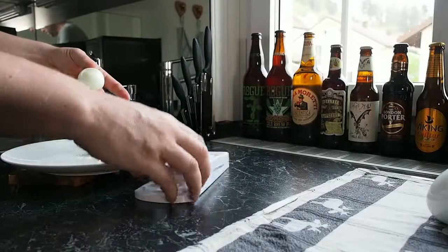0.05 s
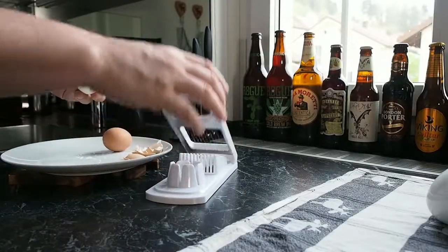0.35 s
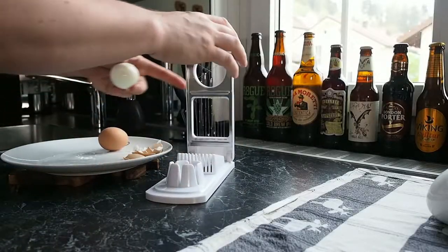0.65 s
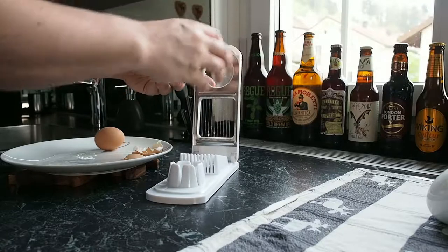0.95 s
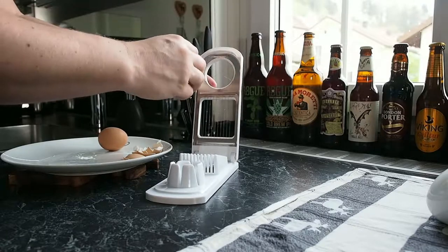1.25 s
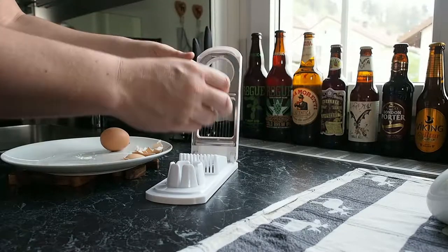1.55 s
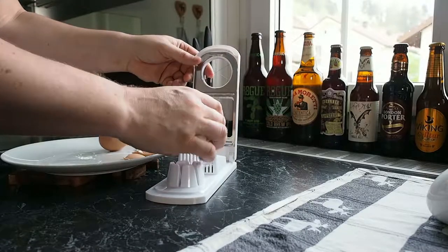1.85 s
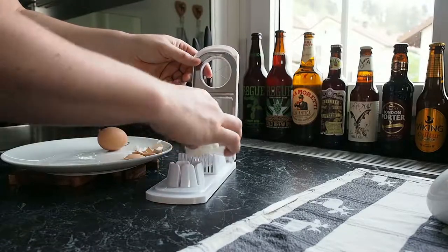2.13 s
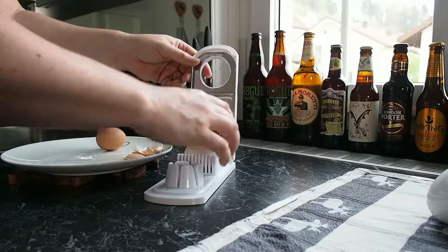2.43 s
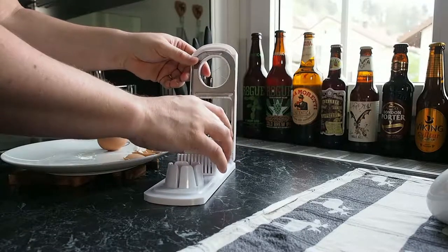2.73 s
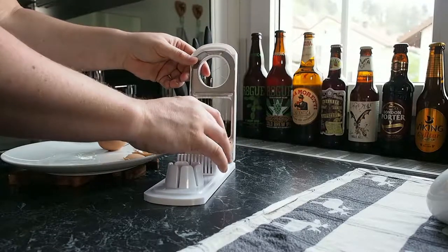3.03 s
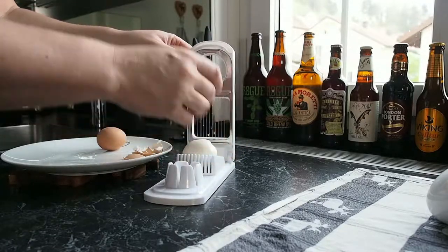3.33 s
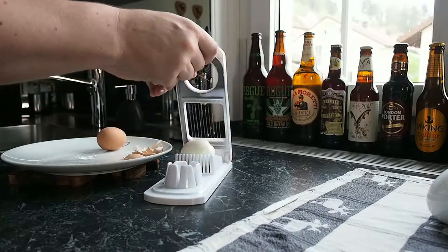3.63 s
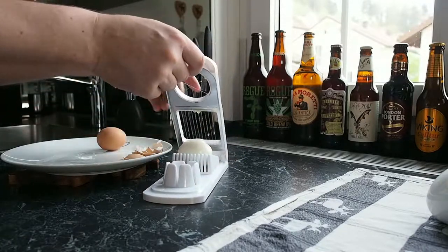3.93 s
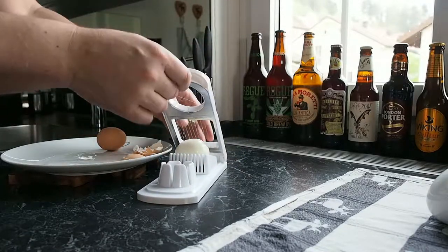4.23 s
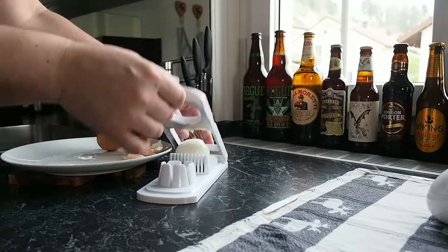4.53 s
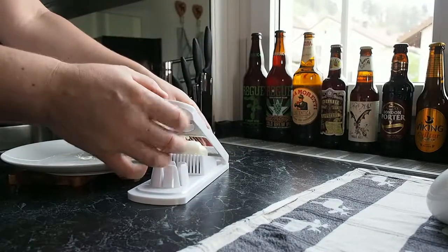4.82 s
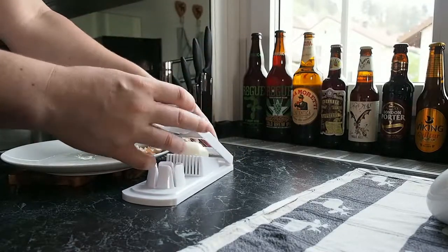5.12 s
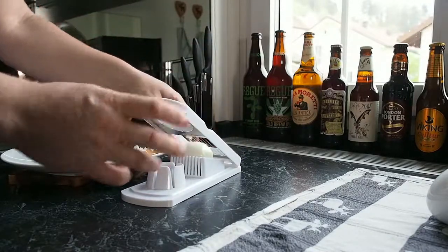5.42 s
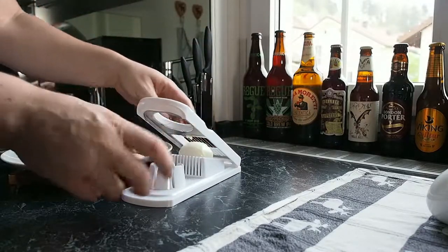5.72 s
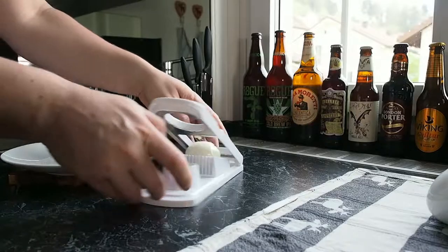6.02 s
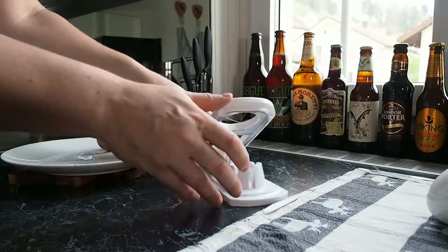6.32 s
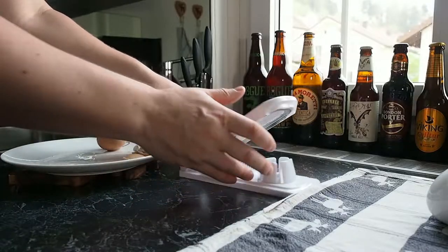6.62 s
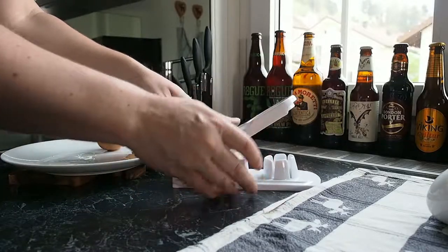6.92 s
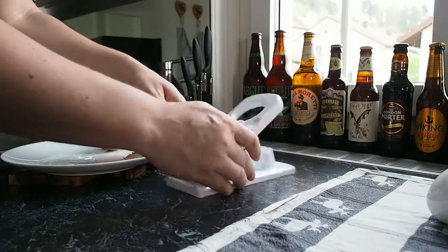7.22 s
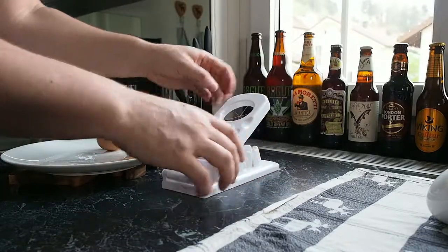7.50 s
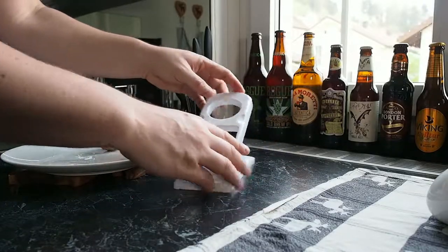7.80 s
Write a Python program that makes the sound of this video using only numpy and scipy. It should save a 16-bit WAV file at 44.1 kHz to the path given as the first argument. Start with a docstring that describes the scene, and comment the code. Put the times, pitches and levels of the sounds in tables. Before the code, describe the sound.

Close to a single microphone in a kitchen with a faint low rumble, hands work a plastic egg slicer. Its hinged frame and cradle clack unevenly, with soft thumps and a light brush of skin on plastic. Near the end the base is knocked down sharply and dragged over the stone counter four times, a gritty scrape with brief squeals and a few knocks between.

```python
"""Egg slicer on a stone counter

A plastic egg slicer in a kitchen, close to one microphone, in mono over a low steady rumble.
Its wire frame is swung up, a peeled egg is seated in the cradle and the frame is lowered onto it,
with hollow clacks, dull bumps and faint rubbing of fingers. Then the base is knocked down and turned
on the counter in four rasping slides, whose speed sets how loud and how bright they are."""
import sys
import numpy as np
from scipy import signal
from scipy.fft import rfft, irfft, next_fast_len
from scipy.io import wavfile

SR = 44100
rng = np.random.default_rng(int(sys.argv[2]) if len(sys.argv) > 2 else 0)


def wav_out(sig):
    """Save sig, one row per channel (or a flat mono array), as 16-bit PCM at SR to the path in sys.argv[1]."""
    wavfile.write(sys.argv[1], SR, np.round(np.clip(np.atleast_2d(sig).T, -1, 1) * 32767).astype(np.int16))


N = 346626
TIME = np.arange(N) / SR


def from_db(db):
    """Decibels to gain."""
    return 10 ** (np.asarray(db) / 20)


def rms_one(x):
    """Scale to an rms of 1."""
    return x / np.sqrt(np.mean(x ** 2) + 1e-20)


def at_hz(points, hz):
    """Read a table on a log-frequency axis."""
    freqs, values = np.transpose(points)
    return np.interp(np.log(np.maximum(hz, 1)), np.log(freqs), values)


def band(x, low_hz, high_hz, order=3):
    """Causal band-pass."""
    return signal.sosfilt(signal.butter(order, [low_hz, high_hz], "band", fs=SR, output="sos"), x)


def split_band(x, low_hz, high_hz):
    """One stretch of a spectrum; neighbouring stretches add up without a dip."""
    size = next_fast_len(len(x))
    hz = np.fft.rfftfreq(size, 1 / SR) + 1
    return irfft(rfft(x, size) / (1 + (low_hz / hz) ** 20) / (1 + (hz / high_hz) ** 20), size)[:len(x)]


def colour(x, spectrum):
    """Give a noise-like signal a spectrum."""
    size = next_fast_len(len(x))
    gains = from_db(at_hz(spectrum, np.fft.rfftfreq(size, 1 / SR)))
    return irfft(rfft(x, size) * gains, size)[:len(x)]


def noise(spectrum, size=N):
    """Coloured noise of rms 1."""
    return rms_one(colour(rng.standard_normal(size), spectrum))


def drift(rate_hz):
    """A random wander of rms 1."""
    knots = rng.standard_normal(int(N / SR * rate_hz) + 2)
    return rms_one(np.interp(TIME * rate_hz, np.arange(len(knots)), knots))


# Room tone of the kitchen: freq_hz, level_db
ROOM_SPECTRUM = [(12, -8), (20, -0.5), (44, -8), (83, -13), (130, -18.5), (204, -19), (388, -27.5),
                 (485, -24), (527, -28), (642, -29), (1530, -33.5), (1760, -35), (16000, -41)]

def room_tone():
    """A low steady rumble behind the slicer."""
    return from_db(-57.5) * noise(ROOM_SPECTRUM)


def mode_width_hz(hz):
    """Plastic loses a like share per cycle in every mode; the gripping hand adds a little damping."""
    hand_hz, plastic_loss = 12, 0.036
    return hand_hz + plastic_loss * hz


# Crack of struck plastic: freq_hz, level_db
CRACK_SPECTRUM = [(400, -8), (800, 3.5), (1300, 1.5), (2600, 6), (4500, -5), (8000, -28), (12500, -29),
                  (16000, -38)]
# Thud of the counter beneath it: freq_hz, level_db
THUD_SPECTRUM = [(60, -9), (100, -10.5), (135, 8.5), (210, -4), (300, 1.5), (450, -1.5), (700, -41.5)]

def blows(events, modes, body_db, bite_db, tick_db, thud_db, crack_db,
          crack_t60_s, tick_t60_s, thud_t60_s):
    """Each blow rings the modes with a short crack; hard contacts tick, heavy ones thud the counter."""
    favour_db, tick_per_hardness = 4.5, 2.31
    size = SR // 3
    t, out = np.arange(size) / SR, np.zeros(N + size)
    hz, mode_db = np.transpose(modes)[:, :, None]
    width_hz = mode_width_hz(hz)
    rings = width_hz * from_db(mode_db) * np.exp(-np.pi * width_hz * t) * np.sin(2 * np.pi * hz * t)
    attack = 1 - np.exp(-t / 0.00053)

    def unit_onset(x):
        """Unit rms over the first 20 ms."""
        return x / np.sqrt(np.mean(x[:SR // 50] ** 2))

    for start_s, level_db, weight_db, hardness_db, favoured_hz in events:
        # the place of the blow decides which modes speak most
        lift_db = favour_db * np.exp(-(np.log(hz[:, 0] / favoured_hz) / .06) ** 2)
        strengths = from_db(lift_db + rng.standard_normal(len(modes))) * rng.choice([-1, 1], len(modes))
        crack = noise(CRACK_SPECTRUM, size) * from_db(-60 * t / crack_t60_s)
        shell = attack * (unit_onset(strengths @ rings) + from_db(crack_db) * unit_onset(crack))
        tick = band(attack * crack, 7450, 16700) * from_db(-60 * t / tick_t60_s)
        thud = noise(THUD_SPECTRUM, size) * from_db(-60 * t / thud_t60_s) * (1 - np.exp(-t / 0.002))
        blow = (from_db(body_db) * unit_onset(band(shell, 332, 1790))
                + from_db(hardness_db + bite_db) * unit_onset(band(shell, 2164, 5300))
                + from_db(tick_per_hardness * hardness_db + tick_db) * unit_onset(tick)
                + from_db(weight_db + thud_db) * unit_onset(thud))
        start = round(start_s * SR)
        out[start:start + size] += from_db(level_db) * blow
    return out[:N]


# Modes of the hinged frame: pitch_hz, level_db
FRAME_MODES = [(530, -9), (650, -3), (820, -19), (1165, 0.5), (1300, -3.5), (1410, 0.5), (1570, -2),
               (2030, -3), (2290, -3.5), (2620, 1.5), (2970, -19), (3380, -3.5), (4110, -8.5),
               (4600, -13.5), (5050, -14), (6550, -21), (7140, -3.5), (8520, -17), (10400, -55)]
# Contacts of frame and cradle: start_s, level_db, weight_db, hardness_db, favoured_hz
FRAME_CLACKS = [(0.002, -36.5, -24, -9.5, 1410), (0.08, -41, -32, -1, 2180), (0.206, -38, -21, -9.5, 1160),
                (0.252, -28.5, -19.5, -10.5, 1480), (0.257, -28.5, -28, -33, 1270),
                (0.548, -41.5, -11.5, -17, 1530), (0.563, -37, -17, -12.5, 1310),
                (0.625, -35, -33, -9, 1190), (0.671, -28, -14.5, -11, 1400),
                (0.683, -31, -11.5, -11.5, 1460), (0.985, -37, -22, -8.5, 2040),
                (1.553, -41.5, -28, -20, 1170), (1.604, -41, -36, -13, 1130),
                (1.735, -41, -25, -15.5, 1570), (1.993, -20.5, -25.5, -6, 1150),
                (2.028, -23, -24.5, -3, 1160), (2.407, -31, -24.5, -11.5, 1090),
                (2.447, -42, -27, -9.5, 1570), (2.731, -46.5, -20, -14, 1120),
                (2.819, -37.5, -22, -11.5, 1210), (3.694, -44, -13.5, -12, 1340),
                (3.775, -49.5, -27, -12, 1410), (3.857, -47.5, -19, -10.5, 1360),
                (4.156, -50, -13, -15, 1280), (4.325, -46.5, -11, -12, 1140), (4.389, -39, -25, -15, 1230),
                (4.447, -34, -18, -8, 1260), (4.47, -36.5, -15.5, -29, 1180), (4.591, -39, -27, -24, 1470),
                (4.738, -35.5, -30, -9, 1800), (4.882, -34.5, -24, -13.5, 1290),
                (4.916, -28, -39, -9.5, 2030), (4.933, -31, -22, -12, 1560),
                (5.11, -27, -26.5, -11.5, 1350), (5.226, -47.5, -13, -24, 1140)]

def frame_clacks():
    """The hinged frame and the cradle clack hollowly, close to the microphone."""
    return blows(FRAME_CLACKS, FRAME_MODES, body_db=-14, bite_db=-6.5, tick_db=-4.5, thud_db=-3,
                 crack_db=-4, crack_t60_s=0.042, tick_t60_s=0.034, thud_t60_s=0.15)


# Dull bumps on the counter: start_s, level_db, pitch_hz, t60_s
COUNTER_BUMPS = [(0.004, -46, 158, 0.26), (0.263, -43.5, 303, 0.16), (0.566, -47, 284, 0.12),
                 (0.675, -34, 288, 0.073), (0.688, -46, 146, 0.17), (1.742, -52, 283, 0.14),
                 (4.453, -40, 121, 0.25), (4.47, -44, 194, 0.14), (5.113, -39, 383, 0.087),
                 (6.28, -60, 137, 0.12)]

def counter_bumps():
    """A hand or arm bumps the counter; each soft heavy contact stirs low modes of counter and base."""
    out, t = np.zeros(N + SR), np.arange(SR // 2) / SR
    attack = 1 - np.exp(-t / 0.0051)
    for start_s, level_db, hz, t60_s in COUNTER_BUMPS:
        cluster = noise([(hz / 2, -35), (hz, 0), (hz * 2, -35)], len(t))
        bump = cluster * from_db(-60 * t / t60_s) * attack
        start = round(start_s * SR)
        out[start:start + len(t)] += from_db(level_db - 2) * bump / np.max(np.abs(bump))
    return out[:N]


def swell(middle_s, length_s):
    """A stroke of the hand gathers speed and loses it again."""
    return np.cos(np.pi * np.clip((TIME - middle_s) / length_s, -.5, .5)) ** 2


def slips(per_s, spread_db, judder_db, judder_hz):
    """Friction: a dense rain of tiny uneven slips, bunched as the surface catches and lets go."""
    sizes = from_db(spread_db * np.minimum(rng.exponential(1, N), 5)) * rng.standard_normal(N)
    slipping = rng.random(N) < per_s / SR
    return rms_one(sizes * slipping * from_db(judder_db * drift(judder_hz)))


def resonate(force, modes, wander_db):
    """Parallel resonances, each swelling and fading as the contact point moves."""
    out = 0
    for k, (hz, level_db) in enumerate(modes):
        radius = np.exp(-np.pi * mode_width_hz(hz) / SR)
        feedback = [1, -2 * radius * np.cos(2 * np.pi * hz / SR), radius ** 2]
        ring = signal.lfilter(np.array([1, 0, -1]) * (1 - radius ** 2) / 2, feedback, force)
        out = out + (-1) ** k * from_db(level_db + wander_db * drift(10)) * ring
    return out


# Hiss of skin: freq_hz, level_db
SKIN_SPECTRUM = [(2500, -11.5), (4500, -5), (8000, -3.5), (12500, -2), (16000, -7)]
# Finger strokes on plastic and egg: middle_s, length_s, rub_db, hiss_db
FINGER_STROKES = [(-0.017, .2, -50, -50), (0.35, 0.41, -69.5, -72), (0.53, 0.45, -74, -66.5),
                  (0.824, 0.91, -71, -69.5), (1.566, 0.44, -71, -68), (1.904, 0.38, -70.5, -80),
                  (2.382, 0.15, -67.5, -68), (2.524, 0.083, -82, -72), (3.405, 0.14, -73, -63.5),
                  (3.58, 0.4, -68, -65.5), (3.813, 0.16, -66, -62), (3.953, 0.73, -78, -70),
                  (4.3, 0.24, -69, -71), (4.425, 0.2, -59, -58), (4.55, 0.089, -61.5, -59.5),
                  (4.82, 0.51, -66, -68), (4.957, 0.26, -67, -60.5), (5.057, 0.16, -52, -58),
                  (5.19, 0.21, -67, -78)]

def finger_rubs():
    """Skin rubs the plastic: a soft hiss, a faint stir of the frame's modes and a low murmur."""
    usual_rub_db, murmur_exponent = -55.5, 0.37   # the murmur grows more slowly than the rub
    rub, hiss = sum(from_db([[rub_db], [hiss_db]]) * swell(middle_s, length_s)
                    for middle_s, length_s, rub_db, hiss_db in FINGER_STROKES)
    murmur = from_db(-67.5) * (rub / from_db(usual_rub_db)) ** murmur_exponent
    force = slips(per_s=4000, spread_db=3.5, judder_db=1.5, judder_hz=180)
    stir = resonate(force, FRAME_MODES, wander_db=-3.5) + from_db(-5.5) * force
    return (rub * rms_one(band(stir, 310, 3060, order=2))
            + hiss * rms_one(colour(force, SKIN_SPECTRUM))
            + murmur * rms_one(band(force, 280, 425, order=2)))


# Faint pings while the egg is handled: start_s, level_db, pitch_hz
TOUCH_PINGS = [(1.503, -47.5, 3080), (1.664, -56, 5270), (3.237, -57, 11900)]

def touch_pings(t60_s=0.018):
    """A light touch sets one high mode ringing briefly."""
    out, t = np.zeros(N + SR), np.arange(SR // 8) / SR
    for start_s, level_db, hz in TOUCH_PINGS:
        start = round(start_s * SR)
        out[start:start + len(t)] += from_db(level_db - 60 * t / t60_s) * np.sin(2 * np.pi * hz * t)
    return out[:N]


# Modes of the plastic base: pitch_hz, level_db
BASE_MODES = [(371, -6), (544, -1), (904, -7.5), (1145, 5), (1200, 4), (1350, 1.5), (1435, 2.5),
              (1510, 0.5), (1590, -3), (1885, -2), (2070, -0.5), (2290, 6.5), (2410, -7.5), (2590, 4.5),
              (3040, -13.5), (3580, 0.5), (4190, -21.5), (4960, -5), (7200, -18), (9400, -10), (11700, -29)]
# Contacts of base and counter: start_s, level_db, weight_db, hardness_db, favoured_hz
BASE_KNOCKS = [(5.687, -19, -29.5, -8.5, 1560), (5.691, -24, -25, -24, 1170),
               (5.781, -31.5, -16, -31, 1170), (6.252, -25.5, -28, -7.5, 1220),
               (6.272, -26.5, -13.5, -10, 1210), (6.29, -32, -28, -14, 1400), (6.31, -37, -19, -7, 1200),
               (6.89, -29, -23, -12.5, 1170), (7.244, -35.5, -12.5, -13.5, 1410),
               (7.387, -31.5, -22, -11.5, 1410), (7.454, -26.5, -18, -10.5, 1410)]

def base_knocks():
    """The base knocks on the stone counter and rings briefly."""
    return blows(BASE_KNOCKS, BASE_MODES, body_db=-16.5, bite_db=-6.5, tick_db=-1.5, thud_db=-9,
                 crack_db=-1.5, crack_t60_s=0.059, tick_t60_s=0.063, thud_t60_s=0.18)


def scrape_gains(slides, stances):
    """Speed drives the scrape: the faster the slide, the more edge and grit stand out over the drag."""
    usual_speed_db = -34.5
    # drag, hollow, rasp, singing, edge, grit
    db_per_speed_db = np.array([0.6, 0.82, 1, 0.93, 1.27, 1.08])[:, None]
    fade_db_per_s = np.array([0, 0, 0, 0, 0, -7.5])[:, None]
    gains = np.zeros((6, N))
    for slide, stance_db in zip(slides, stances):
        time_s, speed_db, _ = np.transpose(slide)
        moving = (TIME >= time_s[0]) & (TIME <= time_s[-1])
        faster_db = np.interp(TIME[moving], time_s, speed_db) - usual_speed_db
        change_db = db_per_speed_db * faster_db + fade_db_per_s * (TIME[moving] - time_s[0])
        gains[:, moving] += from_db(usual_speed_db + np.array(stance_db)[:, None] + change_db)
    return gains


def sing(force, hz, width_hz):
    """Friction drives one resonance whose centre glides."""
    turn = np.exp(2j * np.pi * np.cumsum(hz) / SR)
    radius = np.exp(-np.pi * width_hz / SR)
    return rms_one(np.real(turn * signal.lfilter([1], [1, -radius], force / turn)))


def grit_hiss(shell, depth_db, rate_hz):
    """The grain under the feet keeps changing: each treble band swells and fades by itself."""
    edges_hz = np.geomspace(4700, 18000, 10)
    return rms_one(sum(split_band(shell, low, high) * from_db(depth_db * drift(rate_hz))
                       for low, high in zip(edges_hz, edges_hz[1:])))


# Four slides across the counter, a list of points each: time_s, speed_db, pitch_hz
BASE_SLIDES = [
    [(5.74, -47, 2360), (5.822, -51.5, 2280), (5.866, -35.5, 2110), (5.9, -31, 2320), (5.93, -35.5, 2290),
     (6.008, -33.5, 2340), (6.04, -26.5, 2190), (6.104, -31.5, 2360), (6.23, -58, 2330)],
    [(6.31, -32.5, 2310), (6.42, -31, 2420), (6.476, -36.5, 2130), (6.5, -31.5, 2130), (6.572, -36.5, 2270),
     (6.606, -36, 2214), (6.674, -53, 2320), (6.8, -68, 2330)],
    [(6.83, -61.5, 2120), (6.894, -37, 2380), (7.012, -29, 2460), (7.054, -29.5, 2450), (7.114, -36, 2320),
     (7.192, -54.5, 2330), (7.23, -71, 2350)],
    [(7.41, -51, 2480), (7.436, -48, 2590), (7.458, -40, 2600), (7.47, -39, 2510), (7.526, -32, 2540),
     (7.63, -32, 2400), (7.68, -31.5, 2340), (7.86, -45, 2360)],
]
# How the base sits in each slide: drag_db, hollow_db, rasp_db, singing_db, edge_db, grit_db
BASE_STANCES = [(-15.5, -7, -6, -10.5, -16, -6.5), (-15.5, -8.5, -7, -11, -19.5, -6.5),
                (-15.5, -11, -6, -9.5, -17, -6), (-21.5, -9.5, -6.5, -11, -19, -8.5)]
# The base catches on the stone and its singing swells: middle_s, length_s, level_db
BASE_SQUEALS = [(6.595, 0.085, -38.5), (6.678, 0.041, -56), (7.517, .05, -37.5), (7.685, .12, -33)]
# Friction of plastic on stone: freq_hz, level_db
FRICTION_SPECTRUM = [(130, -14.5), (260, -11.5), (450, -10.5), (700, 1.5), (1000, -12.5), (1400, -6.5),
                     (1750, -29), (2600, 3), (5500, 2), (8000, 4), (12000, 3.5), (14500, -0.5),
                     (16000, -12)]

def base_slides():
    """The base rasps over the stone: its modes ring, one sings, drag growls below, grit hisses on top."""
    drag, hollow, rasp, singing, edge, grit = scrape_gains(BASE_SLIDES, BASE_STANCES)
    squeals = sum(from_db(db) * swell(middle_s, length_s) for middle_s, length_s, db in BASE_SQUEALS)
    time_s, _, pitch_hz = np.vstack(BASE_SLIDES).T
    force = slips(per_s=5000, spread_db=1.13, judder_db=1, judder_hz=220)
    shell = resonate(force, BASE_MODES, wander_db=2.4) + from_db(-9) * colour(force, FRICTION_SPECTRUM)
    return (drag * rms_one(split_band(shell, 100, 950))
            + hollow * rms_one(split_band(shell, 950, 1800))
            + rasp * rms_one(split_band(shell, 1800, 4000))
            + (singing + squeals) * sing(force, np.interp(TIME, time_s, pitch_hz), width_hz=160)
            + edge * rms_one(split_band(shell, 4000, 4700))
            + grit * grit_hiss(shell, depth_db=2, rate_hz=36))


# Decay of the kitchen around the microphone: freq_hz, t60_s
KITCHEN_DECAY = [(150, 0.42), (700, 0.3), (2000, 0.39), (5000, 0.3), (12000, 0.29)]

def kitchen_tail(build_s=0.001):
    """Hard walls and counter give a dense short tail, longest in the bass; unit energy."""
    t = np.arange(SR // 2) / SR
    edges_hz = np.geomspace(70, 18000, 9)
    white = rng.standard_normal((2, len(t)))
    tail = 0
    for k, (low, high) in enumerate(zip(edges_hz, edges_hz[1:])):
        t60_s = at_hz(KITCHEN_DECAY, np.sqrt(low * high))
        tail = tail + band(white[k % 2], low, high) * from_db(-60 * t / t60_s)
    tail = tail * (1 - np.exp(-t / build_s))
    return tail / np.sqrt(np.sum(tail ** 2))


def kitchen(direct, wet_db):
    """The direct sound plus reflections whose pattern keeps changing as arms and slicer move."""
    shares = np.array([drift(rate_hz=4) for _ in range(4)])
    shares = shares / np.sqrt(np.sum(shares ** 2, axis=0))
    reflections = sum(signal.oaconvolve(direct * share, kitchen_tail())[:N] for share in shares)
    return direct + from_db(wet_db) * reflections


def scene():
    """Slicer and hands close by, the kitchen behind; one microphone feeds both channels."""
    slicer = (frame_clacks() + base_knocks() + counter_bumps() + touch_pings()
              + base_slides() + finger_rubs())
    mono = kitchen(slicer, wet_db=-2.5) + room_tone()
    return np.array([mono, mono])


def record(dry):
    """The top is cut steeply."""
    cutoff_hz = 15900
    return signal.sosfilt(signal.ellip(10, .1, 80, cutoff_hz, fs=SR, output="sos"), dry)


dry = scene()
out = record(dry)
wav_out(out)
```